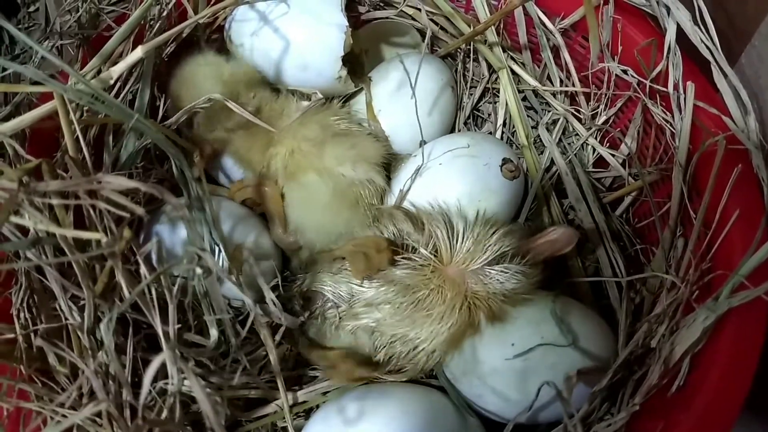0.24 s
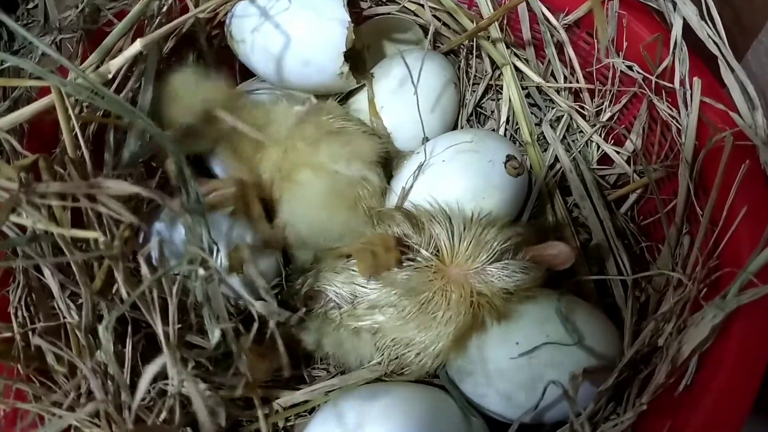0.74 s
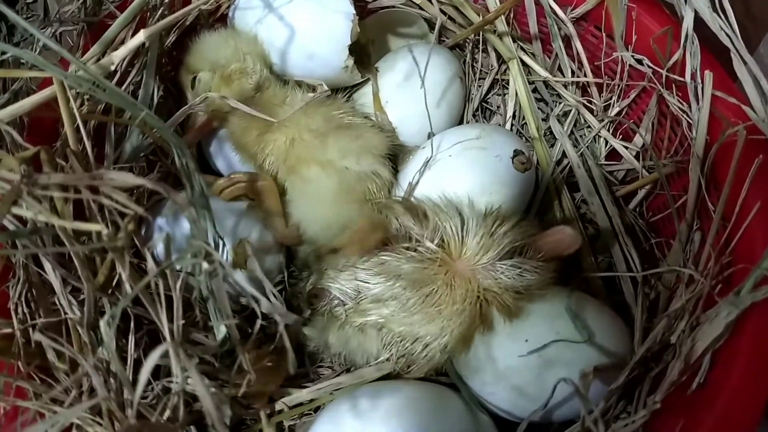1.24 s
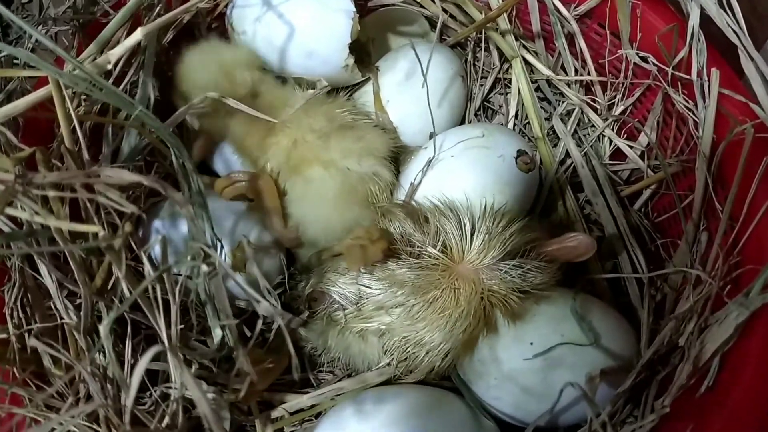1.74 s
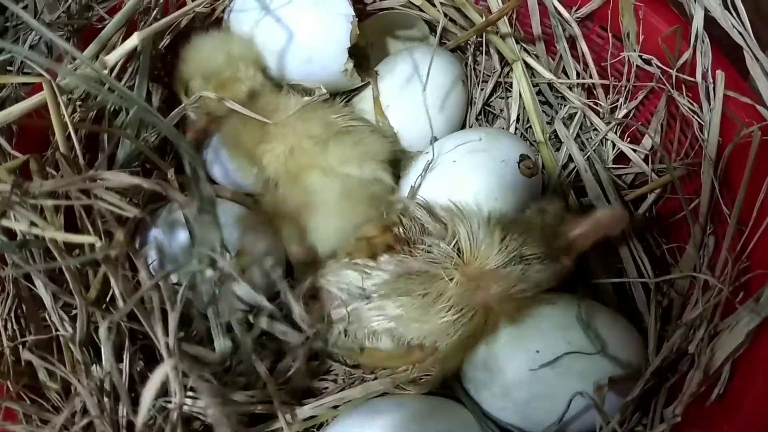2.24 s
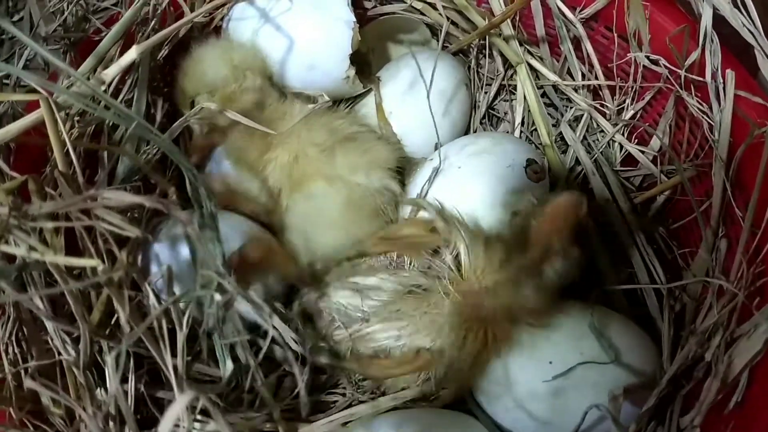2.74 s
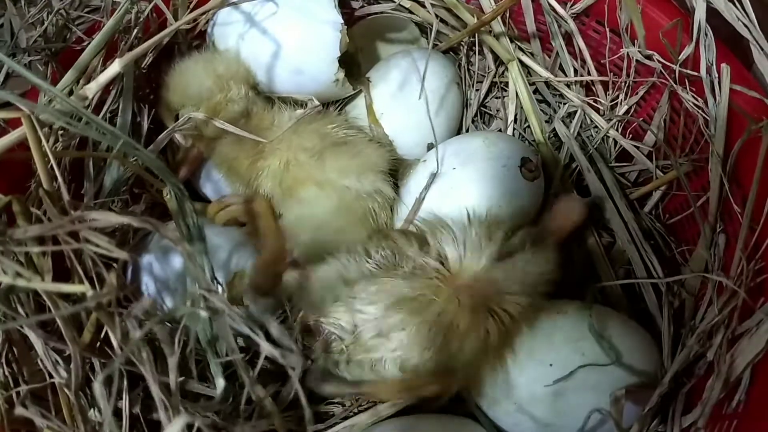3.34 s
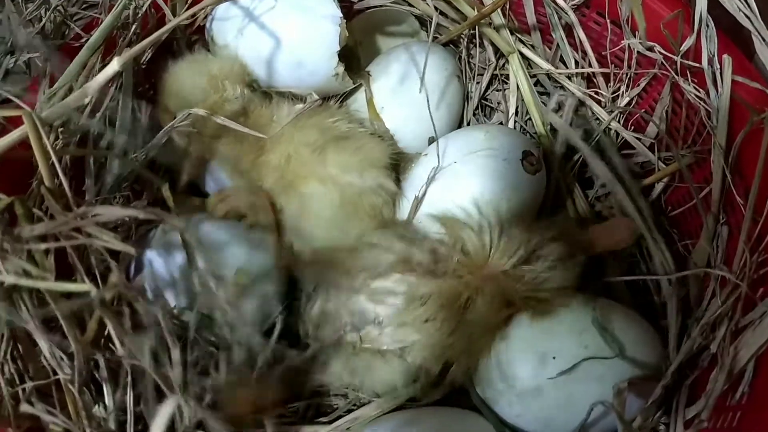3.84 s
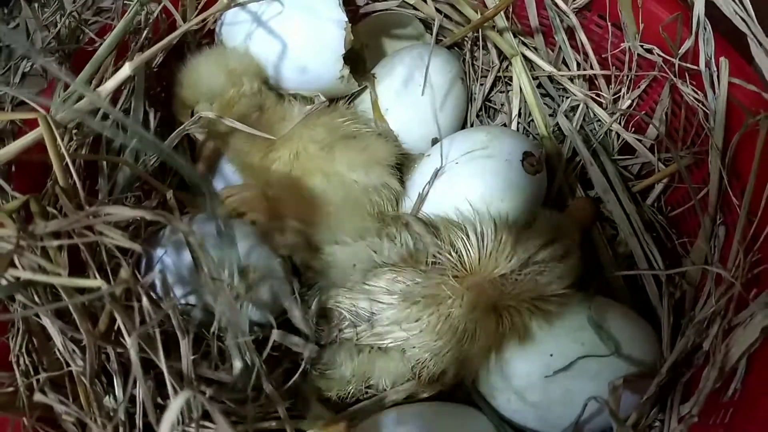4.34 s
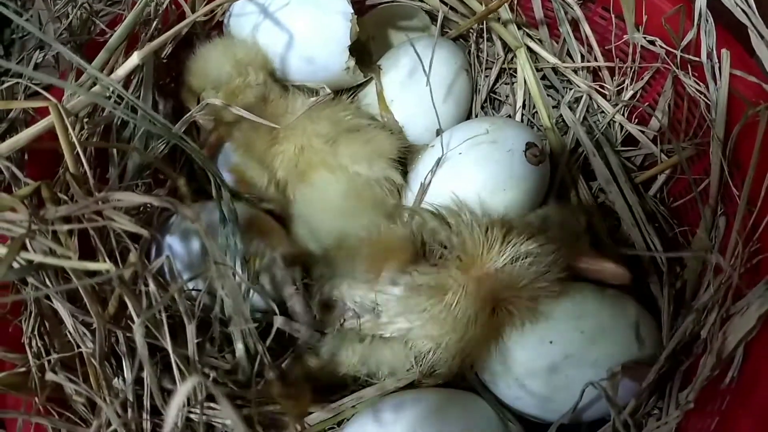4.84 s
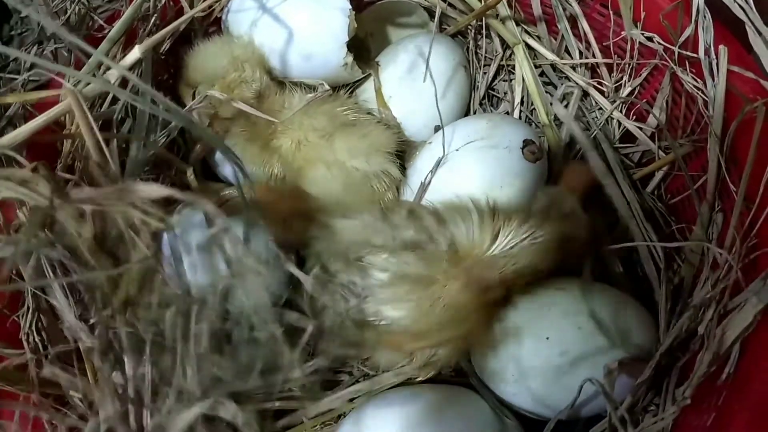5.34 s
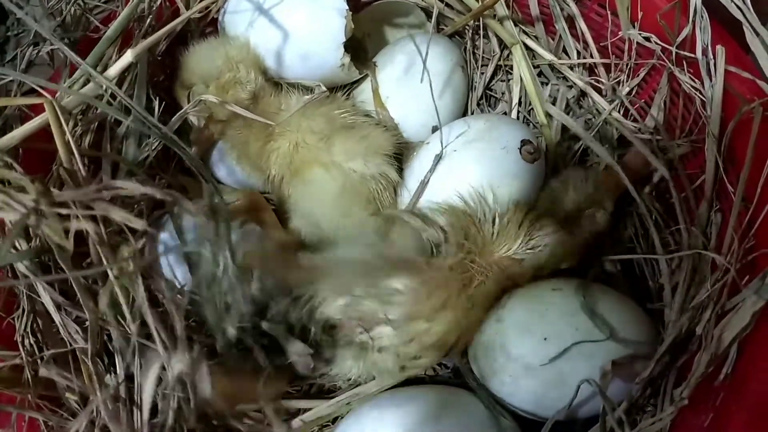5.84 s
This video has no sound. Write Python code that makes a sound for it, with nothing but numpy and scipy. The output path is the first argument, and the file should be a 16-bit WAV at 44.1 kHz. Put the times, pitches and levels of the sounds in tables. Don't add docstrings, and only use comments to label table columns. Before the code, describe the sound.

Stereo microphones close to a nest: three short, high squeals that crack at their edges, then a soft peep and a louder, higher one, later one raspy cut-off peep and two very faint low peeps. Straw crackles in irregular kicks with brittle stalk snaps, busier in the second half. A few dull shell rubs pass quietly. Short room reverberation and a low, steady hum surround everything.

```python
import sys
import numpy as np
from scipy import signal
from scipy.io import wavfile
from scipy.ndimage import uniform_filter1d

SR = 44100
rng = np.random.default_rng(int(sys.argv[2]) if len(sys.argv) > 2 else 0)


def log_audio(samples):
    frames = np.atleast_2d(samples).T
    limited = np.clip(frames, -1, 1)
    pcm = np.round(limited * 32767).astype(np.int16)
    wavfile.write(sys.argv[1], SR, pcm)


def volts(x):
    e = np.asarray(x, float) / 20
    return 10 ** e


N = 269010

# pitch_hz, level_db (per Hz)
AIR_SPECTRUM = [(15, -53), (25, -29), (78, -5.5), (160, -8), (245, -11), (488, -13), (604, -11),
                (923, -7.5), (1080, -10), (4420, -18), (5040, -19.5), (5460, -23), (5920, -26.5),
                (9040, -29), (14200, -32)]
AIR_DB = -62.5
# pitch_hz, width_hz, level_db
MACHINE_TONES = [(91.9, 4.3, -71.5), (158.4, 9.9, -73), (182.1, 10.5, -72), (495.5, 49, -76.5),
                 (739.5, 40, -77), (905, 100, -76), (2772, 52, -77.5), (5480, 21, -79.5)]
# pitch_hz, likeness (-1 to 1)
LIKENESS = [(60, 0.62), (130, 0.91), (290, 0.24), (640, 0.41), (1390, -0.35), (3060, 0.11), (6720, -0.064),
            (14800, 0.078)]
# pitch_hz, left_minus_right_db
TILT = [(60, -3), (110, 19.5), (200, 10.5), (380, 13), (690, -2.5), (1280, 2), (2360, 7.5), (4340, -3.5),
        (8010, 0.5), (14800, 3)]

# pitch_hz, level_db (per Hz)
STRAW_SPECTRUM = [(880, -37), (1500, -1.5), (1700, -19.5), (2100, -5), (2820, -8.5), (4030, -8),
                  (4950, -9.5), (7420, -7), (9210, -0.5), (14200, -9.5)]
# start_s, length_s, level_db
KICKS = [(0.16, 0.012, -58), (0.545, 0.07, -65.5), (0.662, 0.085, -54), (1.094, 0.045, -65),
         (1.462, 0.0081, -74), (1.586, 0.13, -62.5), (2.124, 0.081, -64), (2.218, 0.008, -57),
         (2.37, 0.0078, -67.5), (2.557, 0.24, -72.5), (2.738, 0.12, -64), (3.047, .01, -65),
         (3.13, 0.013, -62.5), (3.247, 0.081, -60), (3.417, 0.0085, -68), (3.66, 0.012, -60.5),
         (3.75, 0.011, -60), (3.845, 0.092, -59.5), (4.028, 0.11, -60), (4.304, 0.0071, -60),
         (4.418, 0.023, -62), (4.55, 0.062, -64.5), (4.837, 0.019, -62.5), (4.96, 0.043, -64),
         (5.032, 0.14, -65.5), (5.27, 0.11, -56.5), (5.446, 0.1, -64), (5.695, 0.15, -62),
         (5.939, 0.042, -55.5), (6.1, .01, -55.5)]
KICK_RISE_DB_PER_S, SETTLE_DB_PER_S, STILL_DB = 248, 162.5, -74
KICK_PAN_DB, PAN_PER_DB = -3, -0.25
# start_s, peak_db, pitch_hz, left_minus_right_db, length_ms
STALK_BREAKS = [(0.75, -53, 4120, -0.5, 6.1), (1.4526, -48.5, 8610, -5, 8.7),
                (1.56, -42.5, 8650, -2.5, 6.5), (1.658, -35, 8400, 0, 4.4), (1.7443, -31, 8650, 1, 2),
                (2.227, -38, 7540, -1, 5), (2.7594, -41, 9220, 0.0, 5.1), (3.1896, -39, 10500, -5, 12),
                (3.209, -40, 7900, -5, 4.1), (3.4126, -35, 9100, -1, 4.4), (3.6656, -34, 7600, 0, 4.9),
                (4.1245, -36.5, 7850, 2.5, 6.9), (4.482, -38.5, 9000, -2.0, 3.8),
                (4.508, -36, 7950, 1, 2.6), (4.5603, -35.5, 3520, -3, 5.7), (4.9465, -40, 8500, -4, 8.9),
                (5.07, -41, 7740, -4, 3.7), (5.2712, -42, 9250, 4, 5.5), (5.331, -41.5, 7330, -5, 18),
                (5.399, -28.5, 9950, 0.5, 14.5), (5.964, -38, 9000, 4, 6), (6.09, -37.5, 10500, -9, 10)]
# start_s, level_db, pitch_hz, length_s
SHELL_RUBS = [
    (3.623, -74, 312, 0.12),
    (3.932, -60.5, 316, 0.16),
    (4.067, -63, 707, 0.086),
    (5.42, -56, 520, 0.033),
]

# start_s, pitch_hz, level_db, roughness (0-1)
SQUEALS = [
    [(.097, 3350, -44, 0.15), (.107, 3680, -31, 0.5), (.122, 3950, -37, 0.95), (.132, 4100, -22.5, 0.29),
     (.16, 4356, -28, 0.31), (.178, 4130, -13, 0), (.195, 4110, -31, 0.77), (.218, 3936, -28.5, 0.43),
     (.23, 3040, -42, .3)],
    [(.582, 3266, -39.5, .4), (.592, 3900, -33.5, 0.44), (.612, 3927, -29.5, 0.62),
     (.632, 4320, -18.5, 0.17), (.646, 4102, -12.5, 0.1), (.657, 4290, -22, 0.16), (.68, 4016, -35, 0.99),
     (.693, 3600, -31.5, 0.14), (.699, 3170, -59, 0.5)],
    [(1.059, 2696, -42, 0.3), (1.066, 3700, -33.5, 0.31), (1.092, 4133, -29.5, 0.54),
     (1.108, 4460, -16.5, 0.02), (1.128, 4316, -27.5, 0.27), (1.154, 4247, -14.5, 0.09),
     (1.168, 4136, -34, 0.98), (1.186, 3640, -31, 0.42), (1.194, 3020, -54, 0.3)],
]
SQUEAL_PAN_DB = [1, 1.5, 0]
# crest_s, rise_s, top_hz, level_db, left_minus_right_db
CLEAN_PEEPS = [
    (2.842, 0.042, 2900, -27, 6.5),
    (3.067, 0.032, 3458, -17.5, 2.5),
]
# crest_s, rise_s, top_hz, level_db, left_minus_right_db
HOARSE_PEEPS = [
    (4.315, .045, 3454, -24, 2.6),
]
# crest_s, rise_s, top_hz, level_db, left_minus_right_db
FAR_PEEPS = [
    (5.005, .025, 2570, -58.5, -1.5),
    (5.457, 0.026, 2425, -48.5, -1.2),
]
# pitch_hz, left_db, right_db
OVERTONES = [(3500, 1, 7), (4490, -15.5, -2), (5200, -28, -26), (5700, -21, -16), (7130, -26.5, -7),
             (7950, -14.5, -18), (8650, -13, -3.5), (10500, -8, -31), (12800, -11, -12.5)]
THIRD_DB = -13
# half_pitch_multiple, level_db
HALF_LINES = [(1, -31), (3, -13.5), (5, -10.5)]
# pitch_hz, width_hz, level_db
THROAT = [(1544, 810, -10.5), (2510, 650, -11.5), (3950, 1650, -3), (5700, 800, -12.5), (6390, 840, -10),
          (8770, 2000, -7), (13000, 1800, -25.5)]
EDGE_S, EDGE_DB = 0.0037, -1
BREAK_POWER = 1.62
BEAT_BEND_HZ, FADE_S = 70.4, .002
LEFT_LAG_S = 55 / 1070000

ROOM_T60_S, ROOM_DB, BASKET_DB = 0.21, -8.5, -9
FAR_T60_S, FAR_DB = 0.51, -23
WALL_DULL = 0.5
# pitch_hz, width_hz, share_removed (0-1)
PORT_DIPS = [(4960, 284, 0.99), (6030, 120, 0.51), (11200, 2600, 0.42)]


def rms_one(x):
    return x / np.sqrt(np.mean(x ** 2) + 1e-20)


def at_hz(points, hz, column=1):
    points = np.array(points)
    return np.interp(np.log(hz), np.log(points[:, 0]), points[:, column])


def drift(rate_hz, size):
    r = np.exp(-2 * np.pi * rate_hz / SR)
    noise = rng.standard_normal(size + 4000)
    return rms_one(signal.lfilter([1], [1, -2 * r, r * r], noise)[4000:])


def resonate(x, hz, width_hz):
    r = np.exp(-np.pi * width_hz / SR)
    zeros = np.array([1, 0, -1]) * (1 - r * r) / 2
    return signal.lfilter(zeros, [1, -2 * r * np.cos(2 * np.pi * hz / SR), r * r], x)


def resonate_twice(x, hz, width_hz):
    return resonate(resonate(x, hz, width_hz), hz, width_hz)


def pan_gains(pan_db):
    return volts(np.multiply.outer([.5, -.5], pan_db))


def bands(source, spectrum, low_hz, patchy_db, rate_hz):
    out = 0
    edges = low_hz * 2 ** np.arange(0, np.log2(19500 / low_hz), 1 / 3)
    for k, (low, high) in enumerate(zip(edges, edges[1:])):
        band_pass = signal.butter(2, [low, high], "band", fs=SR, output="sos")
        mid, side = signal.sosfilt(band_pass, source[k % 2])
        hz = np.sqrt(low * high)
        alike = np.clip(at_hz(LIKENESS, hz), -1, 1)
        flicker = np.repeat(drift(rate_hz * 16, size=N // 16 + 1), 16)[:N]
        gain = volts(at_hz(spectrum, hz) + patchy_db * flicker) * pan_gains(at_hz(TILT, hz))[:, None]
        out = out + gain * (np.sqrt(1 + alike) * mid + np.sqrt(1 - alike) * side * [[1], [-1]])
    return out / np.sqrt(np.mean(out.mean(axis=0) ** 2))


def background():
    noise = rng.standard_normal((2, 2, N))
    out = volts(AIR_DB + 0.5) * bands(noise, AIR_SPECTRUM, low_hz=25.45, patchy_db=0.0, rate_hz=7)
    for hz, width_hz, level_db in MACHINE_TONES:
        tone = rms_one(resonate_twice(rng.standard_normal(N), hz, width_hz))
        out += volts(level_db) * tone * pan_gains(at_hz(TILT, hz))[:, None]
    return out


def room(x):
    t = np.arange(SR // 2) / SR
    near_decay = volts(ROOM_DB - 60 * t / ROOM_T60_S) / np.sqrt(ROOM_T60_S)
    far_decay = volts(FAR_DB - 60 * t / FAR_T60_S) / np.sqrt(FAR_T60_S)
    build_up = (1 - np.exp(-t / 0.023)) * np.sqrt(2 * np.log(1000) / SR)
    tail = rng.standard_normal((2, len(t))) * (near_decay + far_decay) * build_up
    tail = signal.lfilter([1 - WALL_DULL], [1, -WALL_DULL], tail)
    for c, lags_s in enumerate(rng.uniform(.001, 0.013, (2, 4))):
        tail[c, (lags_s * SR).astype(int)] += volts(BASKET_DB - 280 * lags_s) * [1, -1, 1, -1]
    return signal.fftconvolve(x, tail, axes=1)[:, :N]


def rustle():
    t = np.arange(N) / SR
    power = volts(2 * STILL_DB)
    for start_s, length_s, level_db in KICKS:
        rise_db = KICK_RISE_DB_PER_S * np.clip(start_s - t, 0, 1)
        settle_db = SETTLE_DB_PER_S * np.clip(t - start_s - length_s, 0, 1)
        power = power + volts(2 * (level_db - rise_db - settle_db))
    sizes = volts(1.97 * np.minimum(rng.exponential(1, (2, 2, N)), 5)) * rng.choice([-1, 1], (2, 2, N))
    crackles_per_s = 5000 * volts(3.0 * drift(40, size=N))
    born = rng.random((2, 2, N)) < crackles_per_s / SR
    crackle = bands(sizes * born + 1e-18, STRAW_SPECTRUM, low_hz=1218.5, patchy_db=1.9, rate_hz=15)
    pan_db = KICK_PAN_DB + PAN_PER_DB * (10 * np.log10(power) + 58)
    return crackle * np.sqrt(power) * volts(6.5) * pan_gains(pan_db)


def stalk_breaks():
    out, t = np.zeros((2, N + 8000)), np.arange(8000) / SR
    for start_s, peak_db, hz, pan_db, length_ms in STALK_BREAKS:
        x = t * 1000 / length_ms
        cracks = rng.standard_normal((2, 8000)) * volts(1.1 * drift(530, size=8000))
        cracks = cracks * (1 - np.exp(-3.0 * x)) * np.exp(-x)
        burst = resonate(cracks, hz, 1120)
        for gain, ring_hz, width_hz in ((0.44, 7900, 5200), (.5, 13500, 2500), (0.34, 3700, 2300)):
            burst = burst + gain * resonate(cracks, ring_hz, width_hz)
        out[:, round(start_s * SR):][:, :8000] += volts(peak_db + 3.5) * burst * pan_gains(pan_db)[:, None]
    return out[:, :N]


def shell_rubs():
    out, t = np.zeros((2, N + 8000)), np.arange(8000) / SR
    for start_s, level_db, hz, length_s in SHELL_RUBS:
        swell = np.sin(np.pi * np.clip(t / length_s, 0, 1)) ** 2
        rub = rms_one(resonate_twice(rng.standard_normal(8000), hz, 74))
        out[:, round(start_s * SR):][:, :8000] += volts(level_db) * swell * rub
    return out[:, :N]


def arch(row, slack, fall, snap, droop, sag_db, rough):
    crest_s, rise_s, top_hz, level_db, pan_db = row
    t = np.arange(-rise_s, rise_s * fall, .001)
    effort = np.clip(1 - (t / rise_s / np.where(t > 0, max(fall, 1), 1)) ** 2, 0, 1)
    edge = np.clip(1 - np.minimum(t - t[0], t[-1] - t) / EDGE_S, 0, 1)
    hz = top_hz * (slack + (1 - slack) * effort ** np.where(t > 0, droop, snap))
    level_db = level_db - sag_db * (1 - effort) + EDGE_DB * edge
    return np.transpose([crest_s + t, hz, level_db, rough * effort]), pan_db


def call(rows, pan_db, wobble_hz, flutter_hz, rasp_db, half_db, over_db, throb, throb_hz, throb_lag_s):
    s, *columns = np.transpose(rows)
    start, stop = round(s[0] * SR), round(s[-1] * SR)
    t = np.arange(start, stop) / SR
    hz, level_db, rough = (uniform_filter1d(np.interp(t, s, c), size=130) for c in columns)
    rough = np.clip(rough, 0, 1) ** BREAK_POWER

    loudest_s = s[np.argmax(columns[1])]
    beat = np.pi * throb_hz * (t - loudest_s - throb_lag_s)
    swell = 1 - throb * (1 - rough) * np.sin(beat) ** 2
    hz = hz + BEAT_BEND_HZ * throb * np.sin(2 * beat + 0.78)
    hz = hz + rough * wobble_hz * drift(297, size=9000)[:len(t)]

    flutter_rate_hz = flutter_hz * (1 + .1 * drift(120, size=9000)[:len(t)])
    flutter = 2 * np.pi * np.cumsum(flutter_rate_hz) / SR
    stutter_db = 5.3 * np.cos(flutter) + 7.5 * drift(200, size=9000)[:len(t)] - 3.5
    phase = 2 * np.pi * np.cumsum(hz) / SR + 1.74 * rough * np.sin(flutter + 0.39)
    phase = phase - 2 * np.pi * hz * LEFT_LAG_S * [[1], [0]]

    tone = np.sin(phase)
    for k, extra_db in ((2, 0.0016), (3, THIRD_DB)):
        overtone_db = np.array([at_hz(OVERTONES, k * hz, column=c) for c in (1, 2)])
        tone += volts(overtone_db + extra_db + over_db) * np.sin(k * phase)
    for k, extra_db in HALF_LINES:
        tone += rough * volts(half_db + extra_db) * np.sin(k * phase / 2)

    slaps = np.diff(flutter // (2 * np.pi), prepend=0) * np.sqrt(SR / flutter_hz)
    breath = rng.standard_normal((2, 9000))[:, :len(t)]
    puff = (0.55 * breath + 1.11 * slaps) * volts(6.4 * rough * drift(330, size=9000)[:len(t)])
    rasp = 0
    for k, (throat_hz, width_hz, db) in enumerate(THROAT):
        rasp = rasp + (-1) ** k * volts(db) * resonate_twice(puff, throat_hz, width_hz)

    sound = tone * volts(rough * stutter_db) * swell + rough * volts(rasp_db) * rasp
    fade = np.clip(np.minimum(t - t[0], t[-1] - t) / FADE_S, 0, 1)
    out = np.zeros((2, N))
    out[:, start:stop] = sound * volts(level_db) * pan_gains(pan_db)[:, None] * fade
    return out


def clean_peeps():
    shape = dict(slack=0.6, fall=0.86, snap=0.59, droop=0.99, sag_db=10, rough=.05)
    voice = dict(wobble_hz=150, flutter_hz=1650, rasp_db=3, half_db=1, over_db=-1,
                 throb=0.089, throb_hz=47.4, throb_lag_s=.005)
    return sum(call(*arch(row, **shape), **voice) for row in CLEAN_PEEPS)


def hoarse_peeps():
    shape = dict(slack=0.43, fall=0.52, snap=1.0, droop=1.39, sag_db=22.5, rough=.22)
    voice = dict(wobble_hz=153, flutter_hz=900, rasp_db=12, half_db=17.5, over_db=-5,
                 throb=.9, throb_hz=100.8, throb_lag_s=0.0038)
    return sum(call(*arch(row, **shape), **voice) for row in HOARSE_PEEPS)


def far_peeps():
    shape = dict(slack=.85, fall=1.12, snap=0.75, droop=1.2, sag_db=11, rough=.3)
    voice = dict(wobble_hz=150, flutter_hz=1690, rasp_db=3, half_db=-6, over_db=-10,
                 throb=.15, throb_hz=60, throb_lag_s=.001)
    return sum(call(*arch(row, **shape), **voice) for row in FAR_PEEPS)


def squeals():
    voice = dict(wobble_hz=260, flutter_hz=679, rasp_db=3.5, half_db=-30, over_db=0.5,
                 throb=0.51, throb_hz=90.4, throb_lag_s=.0001)
    return sum(call(rows, pan_db, **voice) for rows, pan_db in zip(SQUEALS, SQUEAL_PAN_DB))


def scene():
    voices = squeals() + clean_peeps() + hoarse_peeps() + far_peeps()
    voices -= 0.61 * resonate(voices, 10670, 2200)
    near = voices + stalk_breaks() + shell_rubs()
    return near + room(near) + rustle() + background()


def top_cut(x):
    return signal.sosfilt(signal.butter(12, 15360, fs=SR, output="sos"), x)


def record(dry):
    for hz, width_hz, share in PORT_DIPS:
        dry = dry - share * resonate(dry, hz, width_hz)
    low_pass = signal.ellip(12, .5, 45, 14280, fs=SR, output="sos")
    return top_cut(signal.sosfilt(low_pass, dry))


dry = scene()
out = record(dry)
log_audio(out)
```